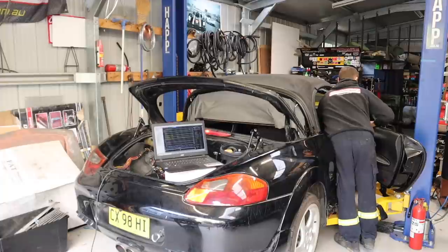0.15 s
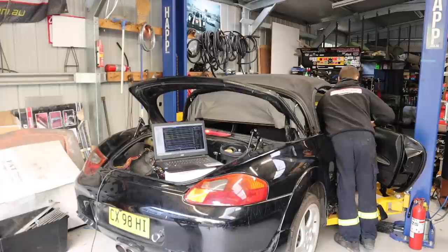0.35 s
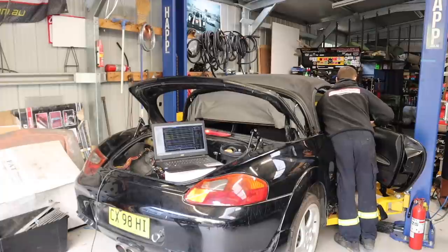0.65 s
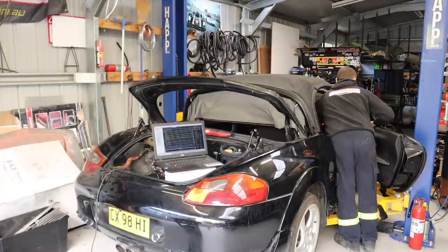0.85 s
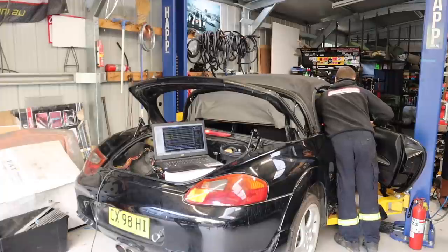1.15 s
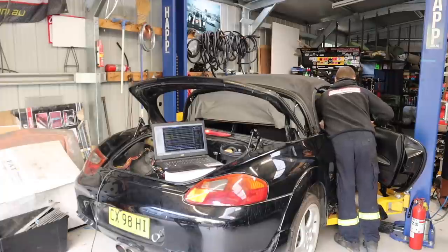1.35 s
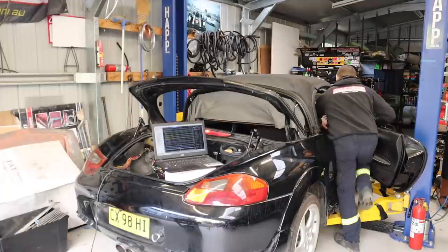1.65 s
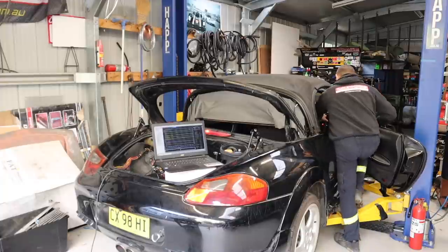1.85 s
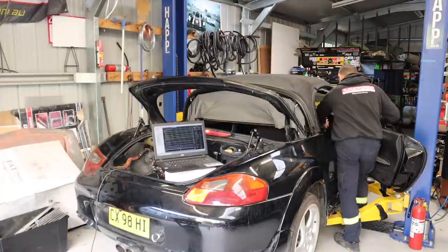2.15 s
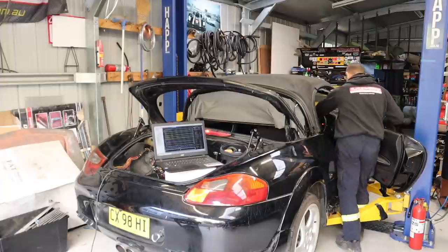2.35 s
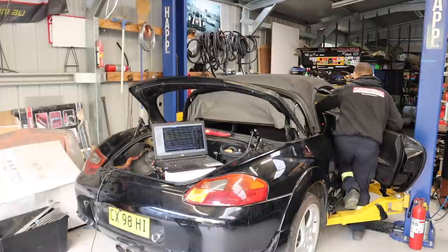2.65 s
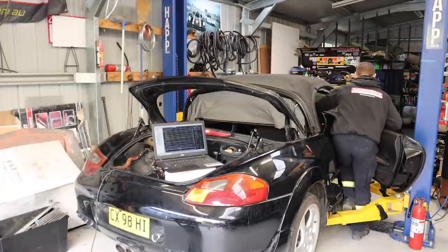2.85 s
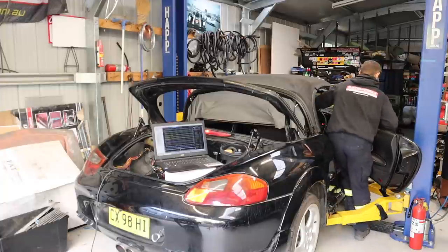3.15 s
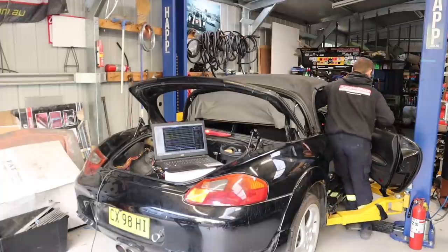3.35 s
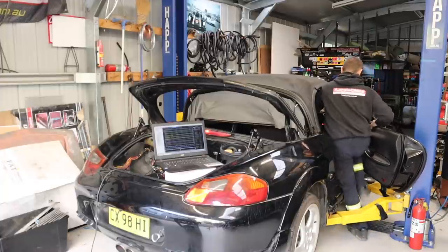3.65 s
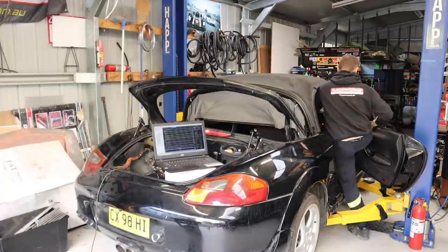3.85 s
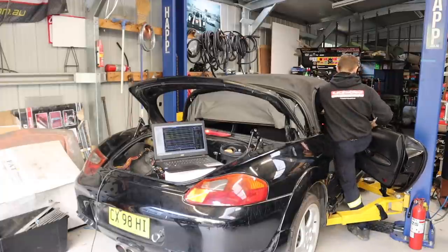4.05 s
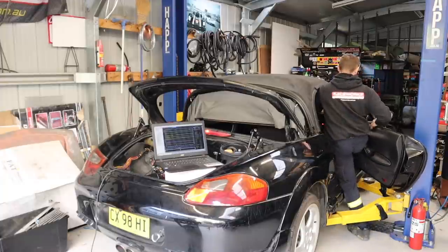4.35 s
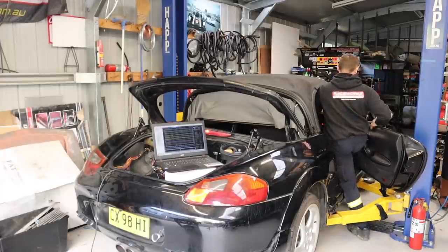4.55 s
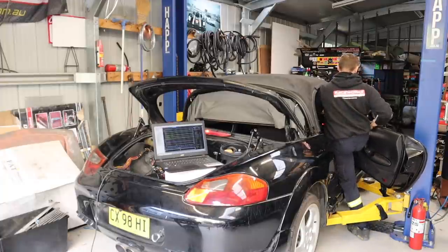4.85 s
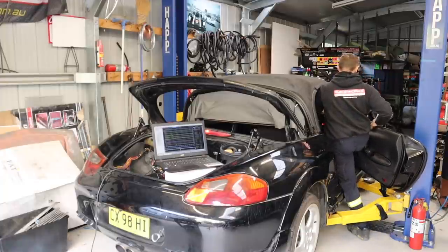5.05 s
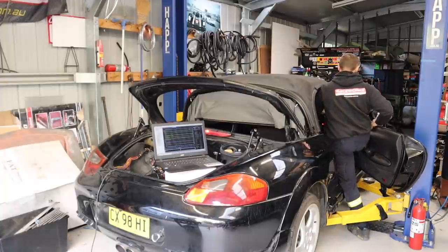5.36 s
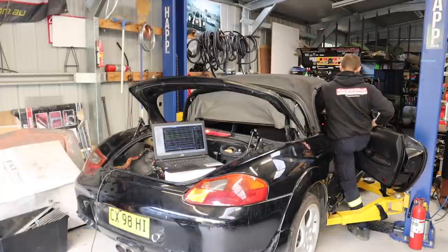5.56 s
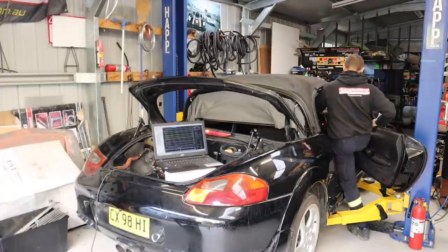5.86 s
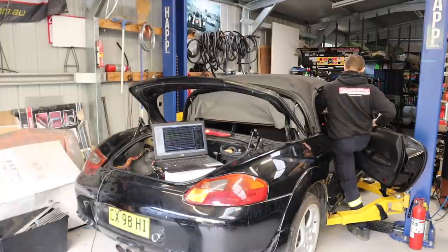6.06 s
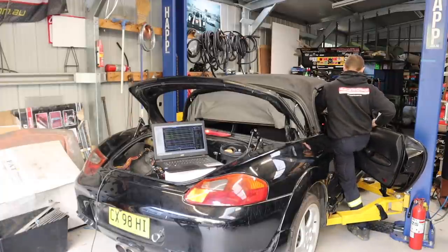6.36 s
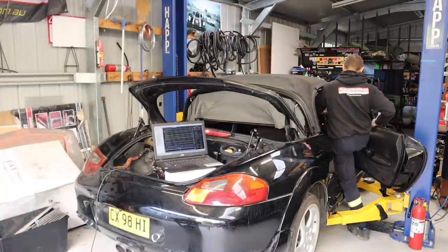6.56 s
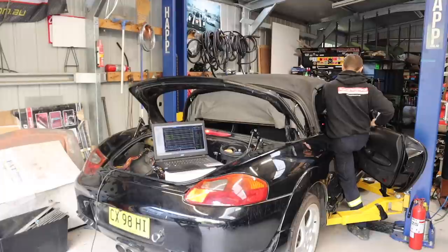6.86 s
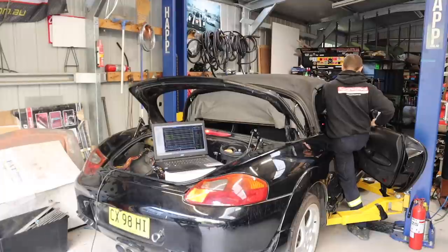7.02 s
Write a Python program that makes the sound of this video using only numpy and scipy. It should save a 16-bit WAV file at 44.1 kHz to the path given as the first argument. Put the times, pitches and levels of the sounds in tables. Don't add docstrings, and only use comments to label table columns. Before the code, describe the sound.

In a metal-walled garage, a slipping belt shrieks on its pulley over a lumpy low engine idle, ticking valve clatter and broad machine noise. Worn patches grab repeatedly with raspy chirps and lower groans. After several seconds a quick throttle blip roars and smooths into a note; the belt slips fully, howling and scrubbing. Revs drop below idle, return with the pulsing squeal, then rise sharply as it ends. Picked up from a few metres, thin in deep bass.

```python
import sys
import numpy as np
from scipy import signal
from scipy.fft import rfft, irfft, next_fast_len
from scipy.io import wavfile
from scipy.ndimage import uniform_filter1d

SR = 44100
rng = np.random.default_rng(int(sys.argv[2]) if len(sys.argv) > 2 else 0)


def master_out(mix):
    frames = np.transpose(np.atleast_2d(mix))
    ceiling = np.clip(frames, -1, 1)
    pcm = np.round(ceiling * 32767).astype(np.int16)
    wavfile.write(sys.argv[1], SR, pcm)


def boost_factor(decibels):
    exponent = np.asarray(decibels, float) / 20
    return 10 ** exponent


N = 317060


def rms_one(x):
    return x / np.sqrt(np.mean(x ** 2) + 1e-20)


def in_time(rows):
    s, *columns = np.transpose(rows)
    return [np.interp(np.arange(N) / SR, s, column) for column in columns]


def bump(s, width_s):
    return np.exp(-((np.arange(N) / SR - s) / width_s) ** 2)


def drift(rate_hz):
    r = np.exp(-2 * np.pi * 20 * rate_hz / SR)
    slow = signal.lfilter([1], [1, -2 * r, r * r], rng.standard_normal(N // 20 + 2002))[2000:]
    return np.interp(np.arange(N) / 20, np.arange(len(slow)), rms_one(slow))


def filtered(x, order, hz, kind):
    return signal.sosfilt(signal.butter(order, hz, kind, fs=SR, output="sos"), x)


def resonate(x, modes):
    out = 0
    for k, (hz, width_hz, db) in enumerate(modes):
        r = np.exp(-np.pi * width_hz / SR)
        poles = [1, -2 * r * np.cos(2 * np.pi * hz / SR), r * r]
        out = out + (-1) ** k * boost_factor(db) * (1 - r * r) / 2 * signal.lfilter([1, 0, -1], poles, x)
    return out


def coloured(spectrum):
    hz = np.arange(1, N // 2 + 2) * SR / N
    at_hz, db = np.transpose(spectrum)
    gain = boost_factor(np.interp(np.log(hz), np.log(at_hz), db, left=-80))
    return rms_one(irfft(rfft(rng.standard_normal(N)) * gain, N))


# (time [s], firing rate [Hz])
CRANK_SPEED = [(0.0, 73.76), (2.0, 73.85), (4.63, 74.88), (4.81, 159), (4.89, 174), (5.04, 188),
               (5.22, 125), (5.3, 108), (5.56, 70), (5.71, 60), (5.85, 57), (5.99, 58.6), (6.33, 70.4),
               (6.5, 74), (6.8, 74), (7.0, 181), (7.1, 222), (7.19, 231)]


def crank_hz():
    return in_time(CRANK_SPEED)[0]


def speed_db():
    return 20 * np.log10(crank_hz() / 74)


# (time [s], gas flow re idle [dB], strength of uneven pulses re idle [dB])
THROTTLE = [(0, -0.5, 1), (4.58, 2.5, -0.5), (4.69, 18, -5), (4.77, 14, -18), (4.91, 11, -18),
            (5.08, 5.5, -21.5), (5.15, 1.5, -18), (5.42, -2.5, -20.5), (5.55, -4.5, -13), (5.76, -9, -24.5),
            (6.05, -4, -12), (6.3, 0.5, -5), (6.5, 0, -1.5), (6.73, 3.5, 0), (6.84, 15, -1.5),
            (6.92, 17.5, -22), (7.08, 19, -15), (7.19, 12, -15)]


def gas_flow_db():
    return in_time(THROTTLE)[0]


# (time belt lets go [s], slip level [dB])
BLIPS = [
    (4.69, 0.5),
    (6.87, -2.5),
]
# (time after [s], share [0-1], howl level [dB], wide scrub level [dB])
SLIP_SHAPE = [
    (-0.06, 0, -30, -25),
    (0.0, 0.6, -30, -21),
    (0.06, 0.84, -31, -28),
    (0.21, 0.84, -22.5, -31.5),
    (0.38, 0.86, -17.5, -24.5),
    (0.649, 0.8, -18, -24),
    (0.74, 0.62, -42, -21),
    (0.92, 0.1, -58, -61),
]


def full_slip():
    out = 0
    for s, db in BLIPS:
        share, howl_db, scrub_db = in_time(np.array(SLIP_SHAPE) + [s, 0, 0, 0])
        share = np.clip(share, 0, 1) * (np.arange(N) / SR > s + SLIP_SHAPE[0][0])
        out = out + share * np.array([np.ones(N), boost_factor(howl_db + db), boost_factor(scrub_db + db)])
    return out


def clatter_level_db():
    gasp = sum(bump(s - 0.097, width_s=0.031) for s, _ in BLIPS)
    return -37 + speed_db() + 0.38 * np.minimum(gas_flow_db(), 0) + 11.5 * gasp


# (frequency [Hz], density [dB per Hz])
FLOOR_SPECTRUM = [(25, -36), (45, -7), (70, 7), (110, 12), (400, -12), (1000, -18), (2000, -12), (4200, 1),
                  (6000, -42), (8500, -16.5), (15000, -31.5)]


def machinery_floor():
    level_db = uniform_filter1d(clatter_level_db(), size=9000) + 4.0
    return boost_factor(level_db) * coloured(FLOOR_SPECTRUM)


def workshop(x):
    t60_s, wall_cut_hz = 0.42, 30000
    size = next_fast_len(N + SR)
    w = 2 * np.pi * np.arange(size // 2 + 1) / size
    t60 = t60_s / (1 + (w * SR / (2 * np.pi * wall_cut_hz)) ** 2)
    answer = 0
    for k, lag in enumerate((rng.uniform(.021, .058, 8) * SR).astype(int)):
        loop = boost_factor(-60 * lag / SR / t60) * np.exp(-1j * w * lag)
        answer = answer + (-1) ** k * loop / (1 - loop)
    return irfft(rfft(x, size) * answer, size)[:N]


# (time seam arrives [s], belt level [dB], seam groan pitch [Hz],
#              fourth patch groan [dB], fifth patch groan [dB])
BELT_LOOPS = [(-0.058, 0, 2600, -47, -30), (0.41, -0.5, 2620, -52, -54), (0.877, 0, 2600, -50, -48),
              (1.349, 0.5, 2400, -24, -49), (1.821, -2, 2600, -60, -47), (2.292, -0.5, 2500, -54, -56),
              (2.763, 0.5, 2080, -50, -47), (3.238, 1, 2150, -23, -24), (3.717, 0, 1980, -34, -22),
              (4.196, 1, 1980, -20, -18), (4.662, -0.5, 2150, -50, -50), (5.13, -1.5, 2400, -49.5, -50),
              (5.6, -10, 2700, -48, -47), (6.081, -1, 2650, -33, -34), (6.55, 1.5, 2090, -20.5, -40),
              (7.01, -7, 2400, -50, -50), (7.48, -4, 2400, -50, -50)]
# (place in loop [0-1], overtone level [dB], lowest overtone [Hz], hold [s], squeal pitch [Hz])
PATCHES = [
    (0.0, -28, 5000, 0.049, 2982),
    (0.09, -24, 4250, 0.05, 2880),
    (0.28, -28.5, 5080, 0.055, 2936),
    (0.526, -25, 4920, 0.05, 3056),
    (0.764, -27, 4390, 0.049, 3091),
]


def belt_place():
    t, seam_s = np.arange(N) / SR, np.transpose(BELT_LOOPS)[0]
    loops = np.interp(t + .012, seam_s, np.arange(len(seam_s)))
    loop, place = loops.astype(int), loops % 1
    patch_at = np.transpose(PATCHES)[0] - PATCHES[0][0]
    patch = np.searchsorted(patch_at, place, "right") - 1
    age_s = (place - patch_at[patch]) * np.diff(seam_s)[loop] - 0.0074
    return loop, place, patch, np.maximum(age_s, 0)


def belt_state():
    loop, place, patch, age_s = belt_place()
    belt_db, seam_hz = np.transpose(BELT_LOOPS)[1:3, loop]
    hold_s, bitten_hz = np.transpose(PATCHES)[3:, patch]
    bite = np.exp(-np.maximum(age_s - hold_s, 0) / 0.07)
    pull = boost_factor(1.5 * np.minimum(belt_db, 0))
    return belt_db, seam_hz, place, bitten_hz, bite, pull


def ribs(hz, width_hz, wobble, patchy_db, overtones_db, count):
    out = 0
    for place in np.arange(count) / count:
        grip = np.cumsum(rng.random(N) < 48 / SR)
        jump, strength = rng.standard_normal((N // 300, 2))[grip].T
        pitch_hz = (hz + width_hz * (place + .14 * jump)) * (1 + wobble * drift(200))
        turn = 2 * np.pi * np.cumsum(pitch_hz) / SR
        wave = sum(boost_factor(db) * np.sin((k + 1) * turn) for k, db in enumerate(overtones_db))
        out = out + wave * boost_factor(np.minimum(patchy_db, 4.5) * uniform_filter1d(strength, size=200))
    return rms_one(out)


# (frequency [Hz], density [dB per Hz])
SCRUB_SPECTRUM = [(530, -46), (900, -17.5), (1210, -18.5), (1800, -11), (2420, -3), (3000, -8), (5310, -3),
                  (8760, -21), (15500, -47)]


def howl_and_scrub():
    _, howl_gain, scrub_gain = full_slip()
    howl_hz = 2400 - 75 * np.clip(speed_db(), 0, 8)
    howl = ribs(.88 * howl_hz, 420, wobble=.032, patchy_db=11.0, overtones_db=[0, -8], count=5)
    scrub = boost_factor(6.0 + 1.34 * drift(6.9)) * coloured(SCRUB_SPECTRUM)
    return howl_gain * howl + scrub_gain * scrub


# (frequency [Hz], density [dB per Hz])
HISS_SPECTRUM = [(4710, -48), (8000, -6), (8500, -9), (8910, -12), (9720, -11), (11700, -25.5),
                 (14400, -23), (15500, -31)]


def rubber_hiss():
    belt_db, _, place, _, bite, _ = belt_state()
    hiss_db = -39.5 + 1.4 * belt_db - 9 * place * (1 - full_slip()[0]) + 3.5 * bite
    return boost_factor(uniform_filter1d(hiss_db, size=900) + 3.6 * drift(11.7)) * coloured(HISS_SPECTRUM)


def pulley_ring():
    belt_db, _, place, *_ = belt_state()
    ring_db = -22.5 + 0.84 * belt_db - 1.5 * place ** 2 - 14 * full_slip()[0]
    ring = ribs(6460, 1400, wobble=.015, patchy_db=3.0, overtones_db=[0], count=7)
    return boost_factor(uniform_filter1d(ring_db, size=900) - 1) * ring


def belt_squeal():
    belt_db, seam_hz, place, bitten_hz, bite, pull = belt_state()
    free_hz = 3206
    drag_hz = bitten_hz - free_hz + 0.3 * (seam_hz - 2300)
    hz = uniform_filter1d(free_hz + drag_hz * bite * pull, size=900)
    squeal_db = uniform_filter1d(-23.5 + 0.67 * belt_db + (4 * bite - 5.5 * place) * pull, size=900)
    squeal = ribs(hz - 260, 3750 - hz, wobble=.017, patchy_db=11.5, overtones_db=[0, -10], count=5)
    locked = ribs(3170, 43.2, wobble=0.00605, patchy_db=-2.0, overtones_db=[0], count=1)
    return boost_factor(squeal_db + 0.5) * (squeal + 0.25 * locked)


def patch_grabs():
    loop, _, patch, age_s = belt_place()
    _, belt_db, seam_hz, fourth_db, fifth_db = np.transpose(BELT_LOOPS)[:, loop]
    _, overtones_db, low_hz, hold_s, _ = np.transpose(PATCHES)[:, patch]
    groan_db = np.choose(patch, [-25.5 + belt_db, -24.5 + belt_db, -31 + belt_db, fourth_db, fifth_db])
    groan_hz = np.choose(patch, [seam_hz, seam_hz, np.maximum(seam_hz + 120, 2480), 2316, 2400])
    bite = np.minimum(age_s / 0.005, 1) * boost_factor(-60 * np.maximum(age_s - hold_s, 0) / 0.097)
    slow_bite = np.minimum(age_s / 0.063, 1) * boost_factor(-60 * np.maximum(age_s - hold_s + .02, 0) / 0.095)
    low = .94 * low_hz
    overtones = ribs(low, 6247 - low, wobble=0.018, patchy_db=3.0, overtones_db=[0, -22], count=8)
    groan = ribs(.97 * groan_hz, 700, wobble=0.029, patchy_db=2.0, overtones_db=[0, -6], count=3)
    rasp = overtones + boost_factor(-19) * coloured(HISS_SPECTRUM)
    out = bite * boost_factor(overtones_db + belt_db + 2.5) * rasp + slow_bite * boost_factor(groan_db + 5.0) * groan
    return (1 - full_slip()[0]) * out


def gas_puff(turns):
    return boost_factor(np.cos(2 * np.pi * (turns - .3)) + 0.5 * np.cos(np.pi * turns / 4))


# (frequency [Hz], width [Hz], level [dB])
CLATTER_MODES = [(1188, 130, -0.5), (1353, 134, 7), (1483, 380, 0.5), (2070, 36, -7)]


def valve_clatter(turns):
    strikes = gas_puff(turns) * boost_factor(1.8 * drift(27)) * rng.standard_normal(N)
    return boost_factor(clatter_level_db() - 2.0) * rms_one(resonate(strikes, CLATTER_MODES))


# (frequency [Hz], width [Hz], level [dB])
ROAR_MODES = [(248, 48.4, 5.5), (291, 58.4, 8.5), (352, 66, 4.5), (431.6, 61, 4), (465, 51, 2.5),
              (557, 12, -6.5), (552, 107, -1.5), (825, 172, -6.5), (970, 204, -11)]


def gas_roar(turns):
    roar = rms_one(resonate(gas_puff(turns) * rng.standard_normal(N), ROAR_MODES))
    upper = filtered(roar, 2, 340, "high")
    roar = roar + np.clip(0.06 * speed_db(), 0, 1) * (1.2 * upper - roar)
    return boost_factor(-25.5 + gas_flow_db() - 4.5) * roar


# (frequency [Hz], level [dB])
TAILPIPE = [(58, -34), (78, -38), (95, -18), (118, -8), (148, -9.5), (195, -15.5), (214, -30), (232, -37)]


def firing_tone(turns):
    hz, gas_db, phase = crank_hz(), gas_flow_db(), 2 * np.pi * turns
    full_gas_db = 14
    off_idle = np.clip(np.abs(speed_db()) / 0.05 - .2, 0, 1)
    rough_db = 4.5 * np.clip(1.5 - gas_db / full_gas_db, .2, 1)
    stumble = boost_factor(rough_db * np.cos(phase / 4 + 1.6))
    note_db = np.interp(hz, *np.transpose(TAILPIPE)) + 0.62 * np.minimum(gas_db - full_gas_db, 0)
    note = boost_factor(note_db - 17 * bump(5.09, width_s=0.064))
    octave_db = np.interp(2 * hz, *np.transpose(TAILPIPE)) - 15.5 + 0.4 * np.minimum(gas_db, 0)
    octave = boost_factor(octave_db) + boost_factor(-39 + 0.85 * gas_db)
    return np.sqrt(2) * off_idle * stumble * (note * np.sin(phase) + octave * np.sin(2 * phase))


# (pulse strength [dB], extra path to tailpipe [ms])
CYLINDERS = [(3.1, 7.8), (3.9, -3.06), (-3.7, -2.56), (-8.8, 2.48), (-5.3, -3.17), (-6.7, 3.11),
             (-4.0, 2.35), (-1.0, -3.33)]
# (frequency [Hz], width [Hz], level [dB])
PIPES = [(106.2, 29.9, -38.7), (140.7, 33.2, -25.1), (171.1, 14.4, -19.0), (210.0, 21.9, -40.0),
         (278.8, 15.0, -48.4), (352.2, 15.0, -62.9), (488.6, 15.0, -56.0)]
# (frequency [Hz], width [Hz], level [dB])
SHELL = [(232, 25, -42), (255, 25, -47), (295, 30, -46), (318, 25, -48), (485, 25, -52), (590, 40, -57),
         (710, 40, -54)]


def exhaust(turns):
    firing = np.arange(-24, int(turns[-1]))
    run_in, idle_hz = SR // 2, CRANK_SPEED[0][1]
    t = np.arange(N) / SR
    s = np.interp(firing, np.r_[-idle_hz, turns], np.r_[-1, t])
    strength_db, path_ms = np.transpose(CYLINDERS)[:, firing % 8]
    load_db = np.interp(s, *np.transpose(THROTTLE)[[0, 2]])
    pattern = 1 - 0.458 * np.clip(-load_db / 13.5, 0, 1)
    chance_db = 0.63 + 0.46 * np.abs(np.interp(s, t, speed_db()))
    chance = np.clip(rng.standard_normal((len(firing), 2)), -1.6, 1.6) * chance_db[:, None]
    at = ((s + (path_ms + .08 * chance[:, 1]) / 1000) * SR).astype(int) + run_in
    pulses = np.zeros(N + SR)
    pulses[at] = SR * 4 / idle_hz * boost_factor(pattern * strength_db + load_db + chance[:, 0])
    pulses = filtered(pulses, 4, 800, "low")
    low = filtered(resonate(pulses, PIPES), 2, 110, "high")
    high = filtered(resonate(pulses, SHELL), 4, 205, "high")
    return (low + high)[run_in:run_in + N]


def scene():
    turns = np.cumsum(crank_hz()) / SR
    belt = howl_and_scrub() + rubber_hiss() + pulley_ring() + belt_squeal() + patch_grabs()
    bright = belt + valve_clatter(turns) + gas_roar(turns)
    background = machinery_floor() + boost_factor(-13) * workshop(bright)
    return (background + 0.88 * bright + firing_tone(turns) + exhaust(turns))[None]


def roll_off(x):
    return signal.sosfilt(signal.butter(12, 15680, fs=SR, output="sos"), x)


def record(dry):
    thin = filtered(dry, 2, 30, "high")
    mix = 1.203 * np.tanh(thin / 1.313)
    return roll_off(mix)


dry = scene()
out = record(dry)
master_out(out)
```